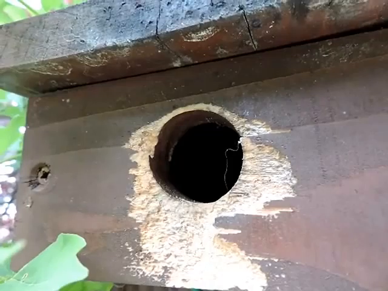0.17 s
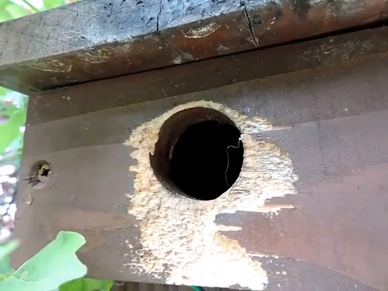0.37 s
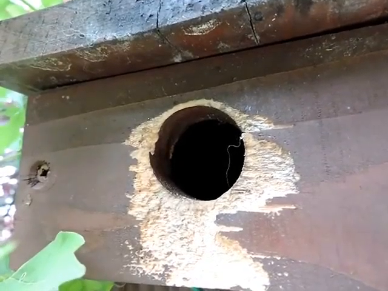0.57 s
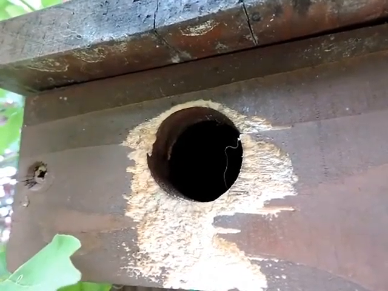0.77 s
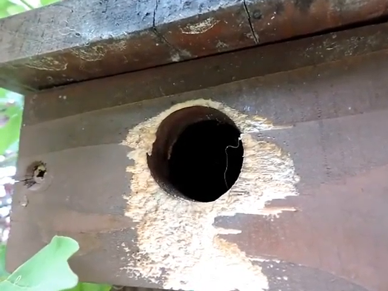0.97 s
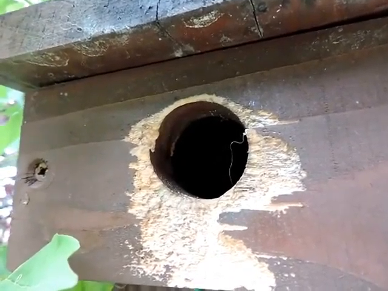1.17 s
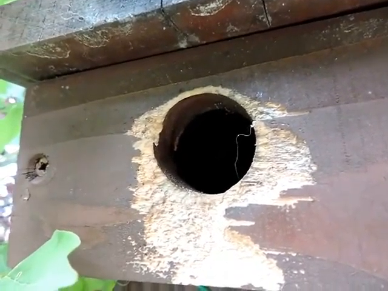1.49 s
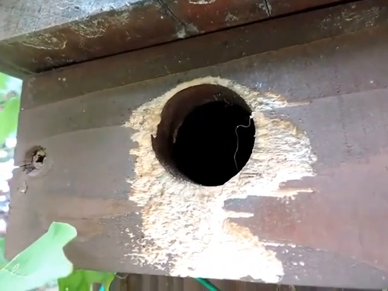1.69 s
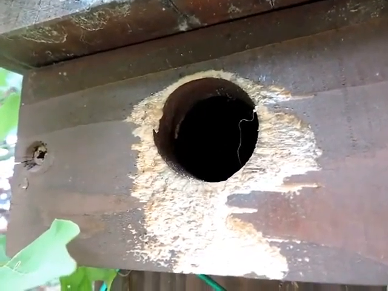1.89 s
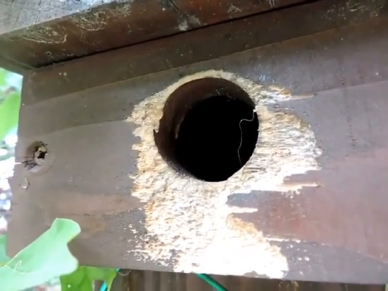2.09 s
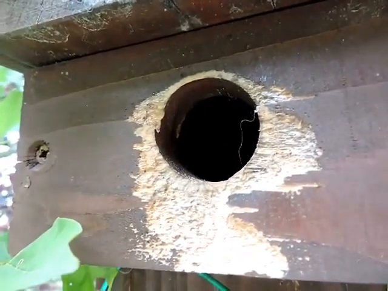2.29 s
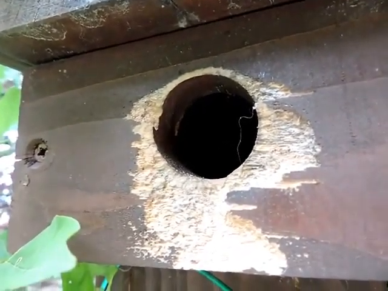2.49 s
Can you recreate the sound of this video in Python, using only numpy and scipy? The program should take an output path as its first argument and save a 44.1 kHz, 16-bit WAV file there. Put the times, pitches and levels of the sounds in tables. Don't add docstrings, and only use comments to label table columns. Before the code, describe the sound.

Hoarse nestling birds chirp in short rising bursts from a wooden nest box in a garden

```python
import sys
import numpy as np
from scipy import signal
from scipy.fft import rfft, irfft
from scipy.io import wavfile
from scipy.ndimage import uniform_filter1d

SR = 44100
rng = np.random.default_rng(int(sys.argv[2]) if len(sys.argv) > 2 else 0)


def rack_gain(trim_db):
    fader = np.asarray(trim_db, float)
    return 10 ** (fader / 20)


def log_audio(samples):
    frames = np.atleast_2d(samples).T
    limited = np.clip(frames, -1, 1)
    pcm = np.round(limited * 32767).astype(np.int16)
    wavfile.write(sys.argv[1], SR, pcm)


N = 116865
FOLD_HZ = 7805


def read(points, hz):
    f, value = np.transpose(points)
    return np.interp(np.log(hz + 1), np.log(f + 1), value)


def evened(x):
    return x / np.sqrt(np.mean(abs(x) ** 2) + 1e-20)


def shaped(x, gain):
    size = x.shape[-1]
    return irfft(rfft(x) * gain(np.fft.rfftfreq(size, 1 / SR)), size)


def slow(size, hz):
    return evened(shaped(rng.standard_normal(size), lambda f: 1 / (1 + (f / hz) ** 4)))


def sides(db):
    return rack_gain(np.array([[db], [-db]]))


def add(mix, s, sound):
    part = mix[:, round(s * SR):][:, :sound.shape[1]]
    part += sound[:, :part.shape[1]]


def pair(same, gain):
    one, other = rfft(rng.standard_normal((2, N)))
    f = np.fft.rfftfreq(N, 1 / SR)
    c = np.clip(same(f), 0, 1)
    right = c * one + np.sqrt(1 - c ** 2) * other
    return irfft(np.array([one, right]) * gain(f), N)


# (frequency [Hz], likeness [0 to 1])
SAME = [(60, 0.54), (180, 0.94), (550, 0.67), (1650, 0.053), (4970, 0.0088), (15000, 0.1)]


def likeness(f):
    return read(SAME, f)


# (frequency [Hz], level [dB per Hz])
HUM = [(35, -38), (60, -5), (211, -7.5), (237, -7.5), (368, -8), (1230, -16.5), (1590, -16.5),
       (3280, -24.5), (15600, -38.5)]
# (time [s], level [dB])
TRAFFIC = [
    (0, 1),
    (.6, -2.5),
    (1.3, -0.5),
    (1.6, 1.5),
    (2.1, -0.5),
    (2.4, 2.5),
    (2.65, 2.5),
]


def traffic_hum():
    hum_db, hiss_edge_hz, traffic_top_hz = -52.5, 15000, 1500
    colour = lambda f: rack_gain(read(HUM, f)) * (f > 50) / np.sqrt(1 + (f / hiss_edge_hz) ** 20)
    hum = rack_gain(hum_db + 0.09 * slow(N, 18)) * evened(pair(likeness, colour))
    passing = rack_gain(np.interp(np.arange(N) / SR, *np.transpose(TRAFFIC))) - 1
    return hum + passing * shaped(hum, lambda f: 1 / (1 + (f / traffic_top_hz) ** 2))


# (frequency [Hz], width [Hz], level [dB])
DRONES = [(94.2, 43, -60.5), (209, 4.2, -61.5), (369.3, 11, -70.5), (783, 26, -71)]


def engine_drones():
    total = np.zeros((2, N))
    for hz, width, db in DRONES:
        band = evened(pair(likeness, lambda f: 1 / (1 + (2 * (f - hz) / width) ** 2)))
        total += rack_gain(db + 2 * slow(N, 2.8)) * band
    return total


# (time [s], level [dB])
WIND = [
    (0, -50.5),
    (.45, -49),
    (.75, -60),
    (1.3, -55),
    (1.6, -45.5),
    (1.9, -47.5),
    (2.1, -53),
    (2.4, -49.5),
]


def wind_rumble():
    wind_hz, left_right_db, shared = 45.4, -2, 0.64
    rumble = evened(pair(lambda f: shared + 0 * f, lambda f: f / (f + 12) / (1 + (f / wind_hz) ** 3)))
    gust_db = np.interp(np.arange(N) / SR, *np.transpose(WIND))
    return rumble * rack_gain(gust_db) * sides(left_right_db / 2)


def garden():
    return traffic_hum() + engine_drones() + wind_rumble()


def echoes(x, t60, start):
    t = np.arange(SR // 3) / SR
    signs = rng.choice([-1., 1.], (2, len(t)))
    present = rng.random((2, len(t))) < .06
    taps = signs * present * rack_gain(-60 * t / t60) * (t > start)
    taps = taps / np.linalg.norm(taps, axis=1, keepdims=True)
    return signal.fftconvolve(x, taps, axes=1)[:, :N]


# (frequency [Hz], level [dB])
COPY_1 = [(8100, -26), (8700, -15), (9800, -14), (10600, -12), (11500, -17)]
# (frequency [Hz], level [dB])
COPY_2 = [(12300, -22), (13800, -19), (14600, -19), (15400, -19)]


def treble(x):
    copy_hz, fold_db = 4060, -21
    band = signal.hilbert(shaped(x, lambda f: np.clip(np.minimum(f - copy_hz, FOLD_HZ - f) / 200, 0, 1)))
    turn = 2j * np.pi * np.arange(N) / SR
    first = shaped((band * np.exp(turn * copy_hz)).real, lambda f: rack_gain(read(COPY_1, f)))
    second = shaped((band * np.exp(turn * FOLD_HZ)).real, lambda f: rack_gain(read(COPY_2, f)))
    fold = shaped((band * np.exp(-turn * FOLD_HZ)).real, lambda f: f < 1500)
    return first + second + rack_gain(fold_db) * fold


# (time [s], level [dB], frequency [Hz])
TICKS = [
    (.181, -50, 3450),
    (0.309, -49, 3290),
    (0.429, -45, 7200),
    (0.66, -52.5, 6950),
    (1.126, -54, 3900),
    (1.732, -52.5, 3450),
    (1.853, -45, 3330),
    (2.119, -48, 3160),
    (.366, -45, 5100),
]


def throat_ticks(birds):
    length_s = .004
    t = np.arange(0, 3 * length_s, 1 / SR)
    for s, db, hz in TICKS:
        swell = np.exp(-(t / length_s - 1) ** 2 * 2)
        blip = rack_gain(db) * swell * np.sin(2 * np.pi * hz * t)
        add(birds, s - length_s, np.ones((2, 1)) * blip)


# (frequency [Hz], level [dB])
THROAT = [(2500, -10), (3100, 2.5), (3800, -0.5), (5000, 9.5), (5900, -9.5), (6700, 8.5), (7600, 4.5),
          (8500, -14)]


def whistles(a, b, air, late, low_db, under_db, side_db, sum_db):
    flutter, flutter_hz, beads, third_db = .3, 250, .4, -12
    mixed_db = sum_db + late + third_db
    lines = [(a, low_db), (b, under_db + late), (2 * a, 0), (2 * b, side_db), (a + b, sum_db + late),
             (2 * a - b, mixed_db), (3 * b - a, mixed_db),
             (2 * b - a, under_db + late + third_db), (3 * a - b, mixed_db)]
    tones, power = 0, 0
    for hz, db in lines:
        gain = rack_gain(db + read(THROAT, hz))
        shake = 1 + flutter * np.minimum(air + beads, 1) * slow(len(hz), flutter_hz)
        tones = tones + gain * shake * np.cos(2 * np.pi * (np.cumsum(hz) / SR + rng.random()))
        power = power + gain ** 2 / 2
    return tones / np.sqrt(power)


# (frequency [Hz], level [dB])
AIR = [(1500, -15), (2600, -12), (3350, -2.5), (4400, -11.5), (5050, -7), (5700, -9), (6850, 1.5),
       (7700, -12)]


def hoarse_air(a, b, low_db):
    shared, grain_db, rasp, size = .75, 1, .5, len(a)
    noise = rng.standard_normal((2, size)) * (1 - shared) + shared * rng.standard_normal(size)
    colour = lambda f: rack_gain(read(AIR, f) + 0.48 * low_db * (f < 4500)) * (f < FOLD_HZ)
    beat = 1 + rasp * np.cos(2 * np.pi * np.cumsum(a - b) / SR)
    return evened(evened(shaped(noise, colour)) * rack_gain(grain_db * slow(size, 89)) * beat)


# (frequency [Hz], level [dB])
TREBLE_HISS = [(7700, -9.5), (9500, -12), (11500, -20.5), (15500, -15)]


def treble_hiss(size, low_db):
    noise = rng.standard_normal((2, size)) + 0.67 * rng.standard_normal(size)
    colour = lambda f: rack_gain(read(TREBLE_HISS, f) - 0.037 * max(low_db, 0) + .5) * (f > FOLD_HZ)
    return shaped(noise, colour)


def chirp(curve, low_db, under_db, side_db, sum_db, pan_db):
    glide_in_hz_per_s, glide_out_hz_per_s, wobble_hz = 9000, 14000, 18
    rise_db_per_s, fall_db_per_s, end_hoarse_db_per_s = 750, 1306, 2000
    lower_joins_s, lower_start_db = 0.045, -5
    s, up, down, level, hoarse = np.transpose(curve)
    t = np.arange(s[0] - .04, s[-1] + .03, 1 / SR)
    before, after = np.maximum(s[0] - t, 0), np.maximum(t - s[-1], 0)
    soft = lambda v: uniform_filter1d(np.interp(t, s, v), size=170, mode="nearest")
    glide = glide_in_hz_per_s * before + glide_out_hz_per_s * after
    a = soft(up) - glide + wobble_hz * slow(len(t), 108)
    b = soft(down) - glide + wobble_hz * slow(len(t), 108)
    air = rack_gain(soft(hoarse) + end_hoarse_db_per_s * (before + after))
    late = lower_start_db * np.clip(1 - (t - s[0]) / lower_joins_s, 0, 1)
    tones = whistles(a, b, air, late, low_db, under_db, side_db, sum_db)
    voice = (tones + air * hoarse_air(a, b, low_db)) / np.sqrt(1 + air ** 2)
    loudness_db = np.interp(t, s, level) - rise_db_per_s * before - fall_db_per_s * after
    shape = rack_gain(uniform_filter1d(loudness_db, size=90))
    return t[0], shape * (treble_hiss(len(t), low_db) + voice * sides(pan_db / 2))


# (time [s], upper side [Hz], lower side [Hz], level [dB], hoarse air against the tones [dB])
WARMUP = [
    [(.08, 3050, 2520, -51, 10), (.088, 3075, 2596, -45, 5), (.1, 3184, 2820, -44, 1),
     (.112, 3400, 2830, -45.5, -5)],
    [(.192, 2960, 2443, -50, 3), (.2, 2950, 2480, -42, -4), (.214, 3144, 2660, -44.5, -1),
     (.228, 3375, 2914, -35, -12), (.234, 3420, 3010, -43.5, 2)],
    [(.32, 2950, 2460, -48.5, 0), (.328, 3018, 2530, -42, -2), (.345, 3270, 2817, -41, 6),
     (.36, 3430, 2940, -39, -12), (.368, 3400, 2980, -45.5, 7)],
    [(1.628, 3113, 2587, -50.5, 10), (1.636, 3160, 2683, -47, 9), (1.648, 3230, 2780, -40.5, -3),
     (1.663, 3350, 2940, -46, 6)],
    [(1.748, 2986, 2470, -50, 6), (1.758, 3067, 2580, -43, 4), (1.773, 3257, 2790, -41.5, -7),
     (1.79, 3520, 3035, -44, 0)],
]
FIRST_RUN = [
    [(.436, 3307, 2937, -46.5, 5), (.447, 3383, 2950, -29.5, -20), (.465, 3534, 3030, -33.5, -6),
     (.487, 3676, 3087, -30, -12), (.495, 3626, 2980, -43, -3), (.512, 3160, 2830, -41.5, -4)],
    [(.548, 3220, 2810, -48.5, -1), (.556, 3430, 2880, -29.5, -16), (.563, 3620, 2926, -35, -3),
     (.57, 3640, 3030, -28.5, -11.5), (.582, 3704, 3116, -29, -10), (.598, 3727, 3120, -33.5, -19),
     (.606, 3810, 3190, -41.5, -3)],
    [(.666, 3333, 2910, -49, 5), (.674, 3373, 2947, -32.5, -14), (.681, 3655, 3085, -37, -16),
     (.687, 3730, 3152, -33.5, -16), (.712, 3754, 3180, -31.5, -17), (.724, 3680, 3190, -37, -20),
     (.731, 3610, 3290, -43.5, -12)],
    [(.83, 3482, 3080, -50, -11), (.84, 3593, 3133, -37, -10), (.853, 3927, 3340, -35, -17),
     (.879, 3638, 3180, -35.5, -13), (.898, 3630, 3070, -42, -12)],
]
LONE = [
    [(1.138, 3575, 3065, -50, 1), (1.153, 3810, 3220, -39, -17), (1.16, 4050, 3260, -46.5, -5),
     (1.172, 4190, 3210, -51, -4)],
    [(1.302, 3540, 3130, -49.5, 2), (1.314, 3745, 3143, -41.5, -7), (1.324, 3910, 3214, -35.5, -13),
     (1.338, 4030, 3230, -42.5, -8), (1.352, 4240, 3250, -46, -13)],
]
SECOND_RUN = [
    [(1.866, 3060, 2520, -46, -3.5), (1.886, 3205, 2760, -42.5, 7), (1.897, 3283, 2880, -30, -19),
     (1.912, 3446, 2988, -34, -6), (1.93, 3520, 2990, -33.5, -6), (1.938, 3316, 2940, -43, -12)],
    [(2.004, 3144, 2770, -42.5, -1), (2.016, 3370, 2890, -28, -9.5), (2.023, 3540, 2970, -33.5, -11),
     (2.032, 3536, 3020, -31, -4), (2.049, 3713, 3100, -34, -12), (2.058, 3554, 3120, -39.5, -4)],
    [(2.127, 3210, 2800, -54.5, 5), (2.134, 3332, 2880, -33, -24), (2.142, 3500, 2990, -39, -3),
     (2.153, 3690, 3100, -32, -14), (2.176, 3726, 3136, -33.5, -14), (2.187, 3670, 3200, -41.5, 0),
     (2.226, 3500, 3150, -42.5, -7)],
    [(2.3, 3650, 3420, -48, 2), (2.311, 3820, 3400, -37.5, -16), (2.32, 3916, 3350, -38.5, -11),
     (2.342, 3723, 3170, -32.5, -16), (2.358, 3685, 3200, -37, -15), (2.37, 3690, 3300, -45, -2)],
]
# (upper whistle [dB], lower whistle [dB],
# lower octave [dB], sum tone [dB], left against right [dB])
BEAKS = [(-4.5, -22, 6, -14, -4.5), (-4, -8, 8, -22, -4.5), (-4, -13, 11, -16, -5.5),
         (-7, -24, 4.5, -4, -6.5), (-6.5, -3, 6, 2, -6.5), (-0.5, -2, 0, -5.5, -3),
         (-3, -3.5, -5, -8.5, -3), (-1, -1.5, -8, -7.5, -5), (-0.5, -2, -10, -9, -4.5),
         (17, 6, -16, -8, -3), (18, 6.5, -2.5, -2, -3), (0, -5, 3.5, -29, -3.5), (-1, -0.5, -1, -4, -3),
         (-1.5, -3, -4, -7.5, -4), (1, -3.5, -10, -8.5, -3.5)]
# (frequency [Hz], lead [radians])
PORT_LEAD = [(3500, 0.5), (7000, 0.94)]


def nestlings():
    box_t60_s, box_db = .03, -12
    yard_t60_s, yard_db = .16, -28.5
    birds = np.zeros((2, N))
    for curve, beak in zip(WARMUP + FIRST_RUN + LONE + SECOND_RUN, BEAKS):
        add(birds, *chirp(curve, *beak))
    throat_ticks(birds)
    birds[0] = shaped(birds[0], lambda f: np.exp(1j * read(PORT_LEAD, f)))
    box = rack_gain(box_db) * echoes(birds, box_t60_s, .001)
    yard = rack_gain(yard_db) * echoes(birds, yard_t60_s, 0.038)
    return birds + box + yard


def scene():
    birds = nestlings()
    return garden() + birds + treble(birds) * sides(0.8)


def band_limit(x):
    return signal.sosfilt(signal.butter(12, 15780, fs=SR, output="sos"), x)


def record(dry):
    top_hz = 15780
    mix = shaped(dry, lambda f: np.clip((top_hz - f) / 100, 0, 1))
    return band_limit(mix)


dry = scene()
out = record(dry)
log_audio(out)
```